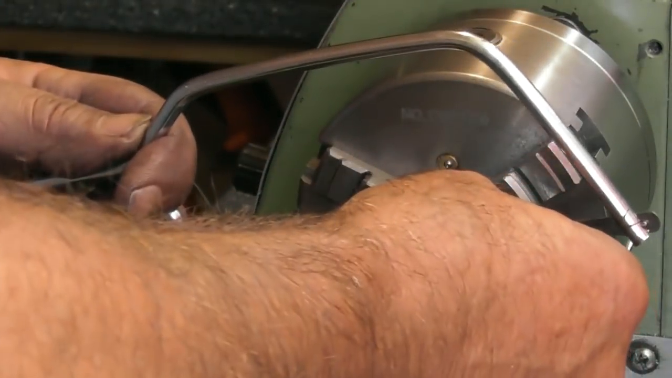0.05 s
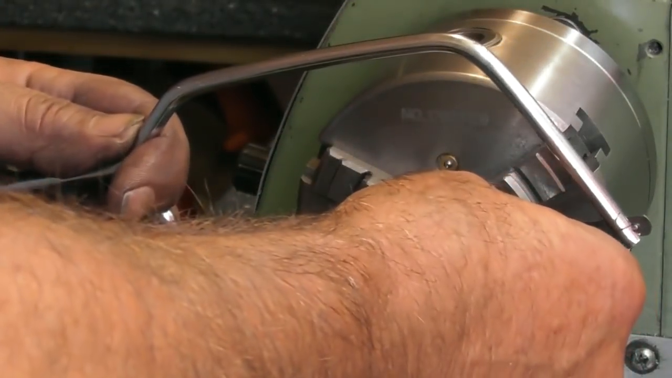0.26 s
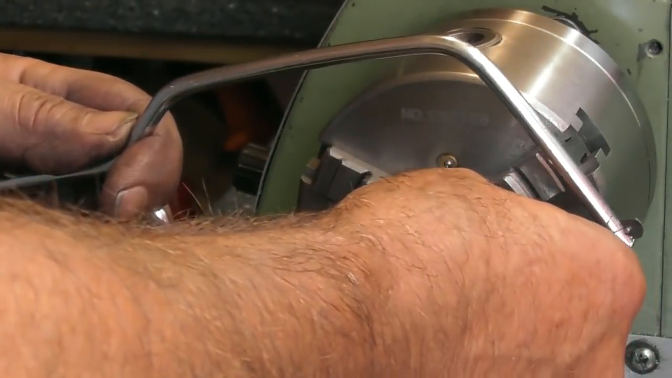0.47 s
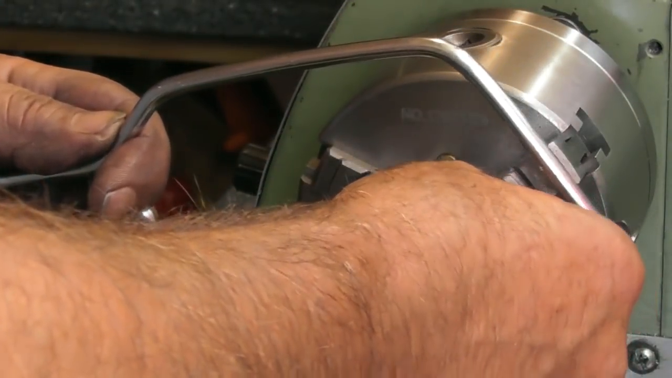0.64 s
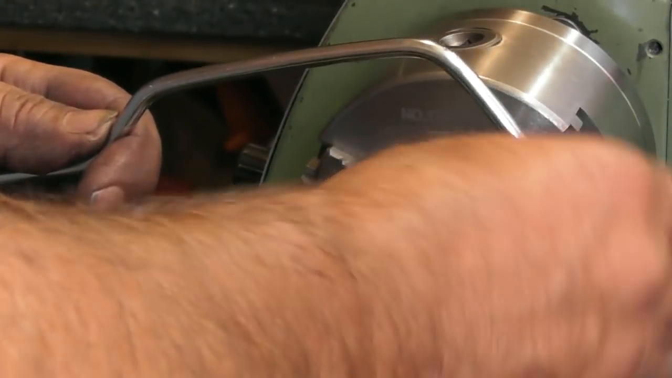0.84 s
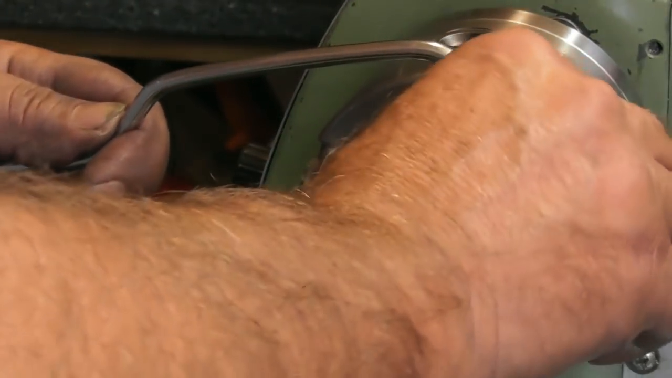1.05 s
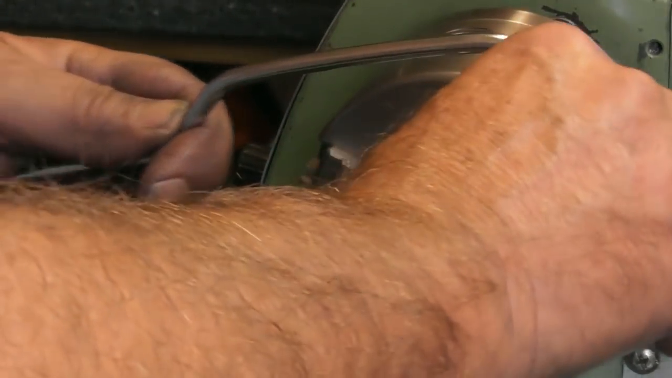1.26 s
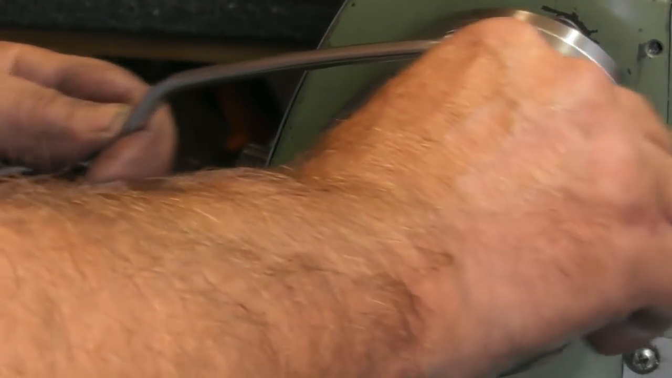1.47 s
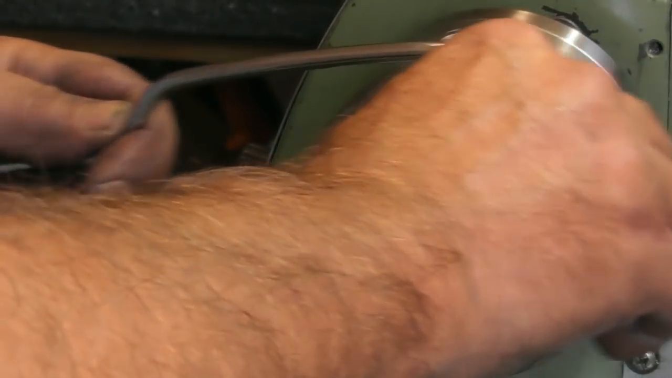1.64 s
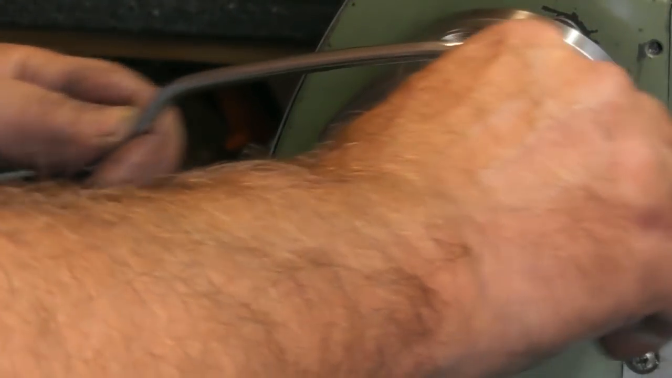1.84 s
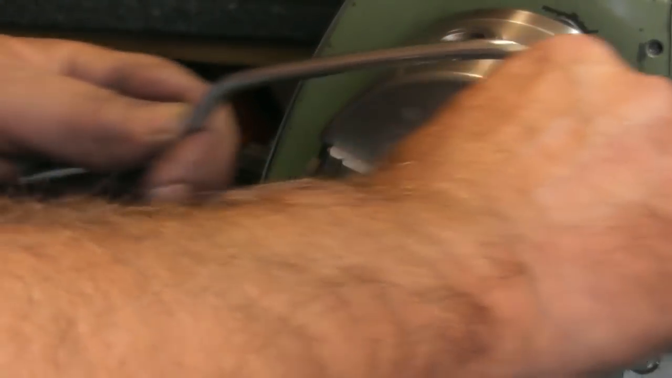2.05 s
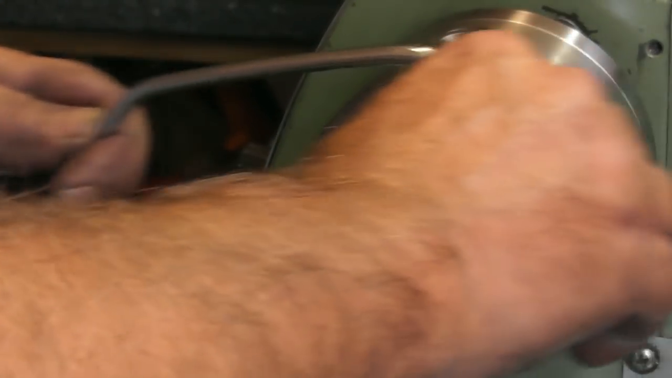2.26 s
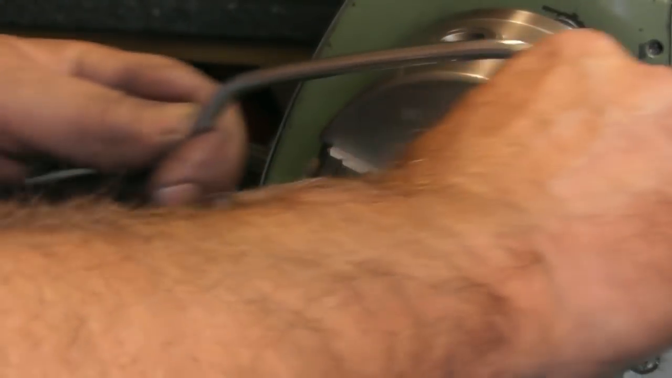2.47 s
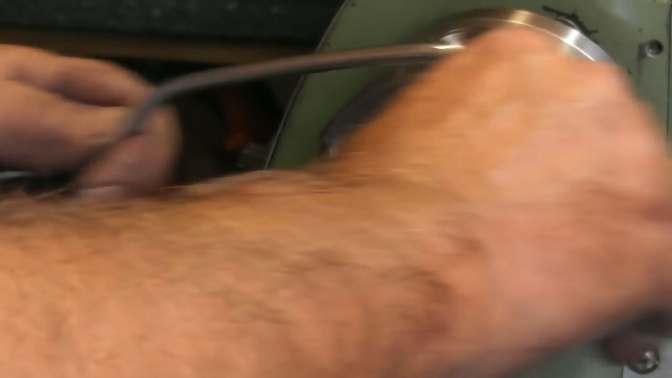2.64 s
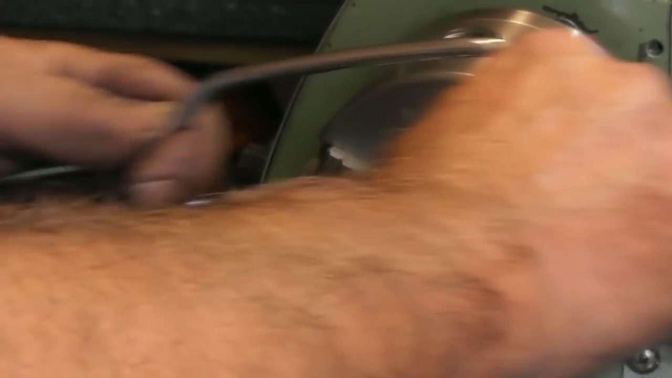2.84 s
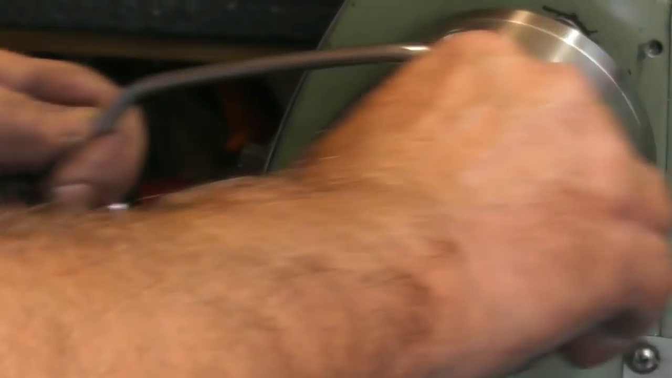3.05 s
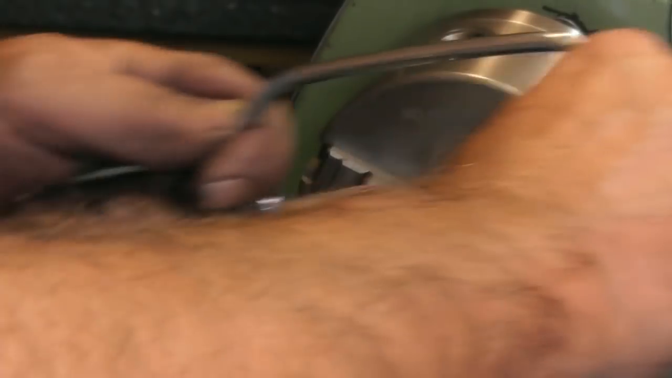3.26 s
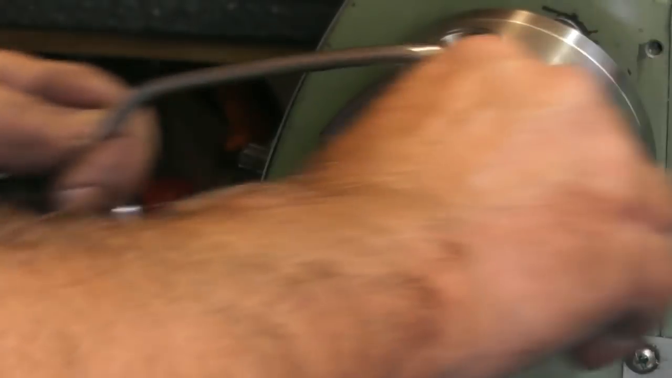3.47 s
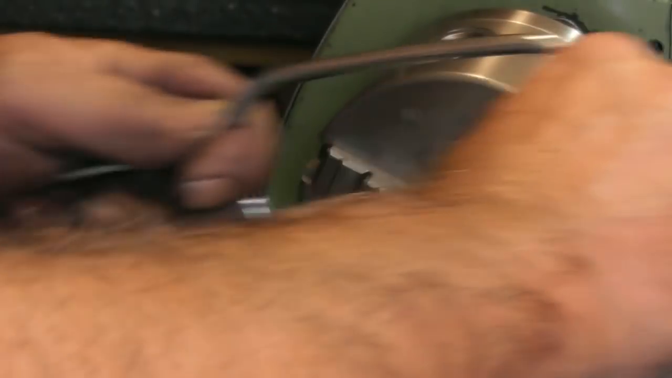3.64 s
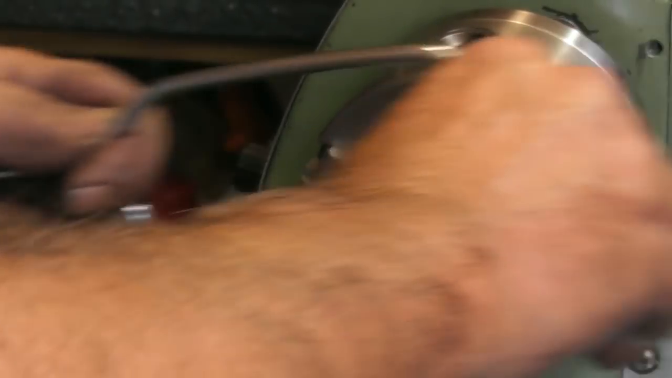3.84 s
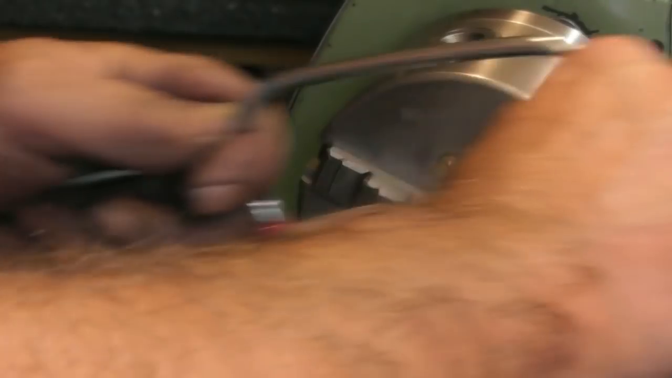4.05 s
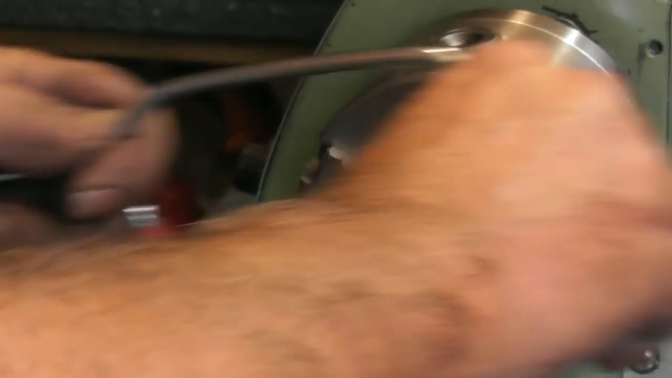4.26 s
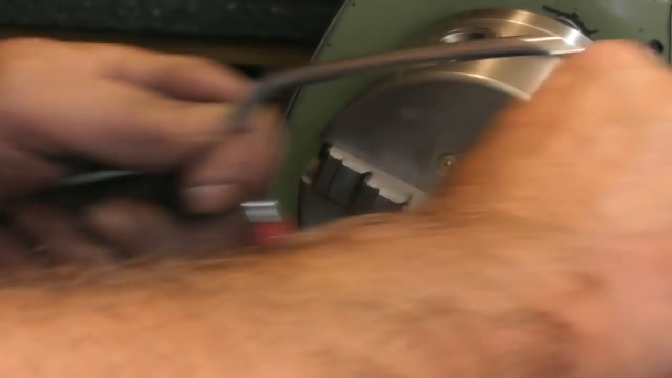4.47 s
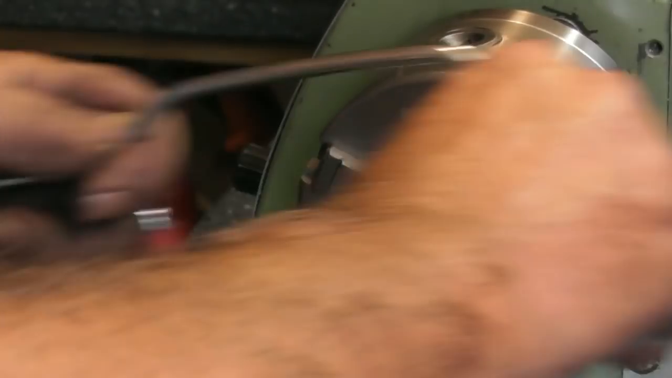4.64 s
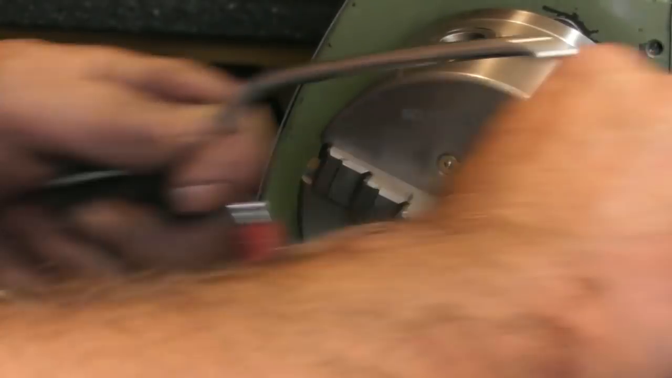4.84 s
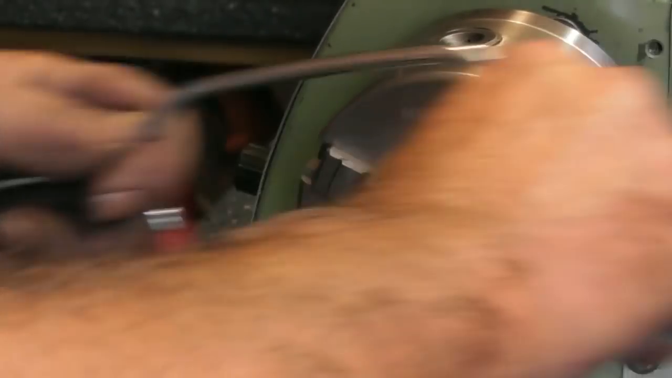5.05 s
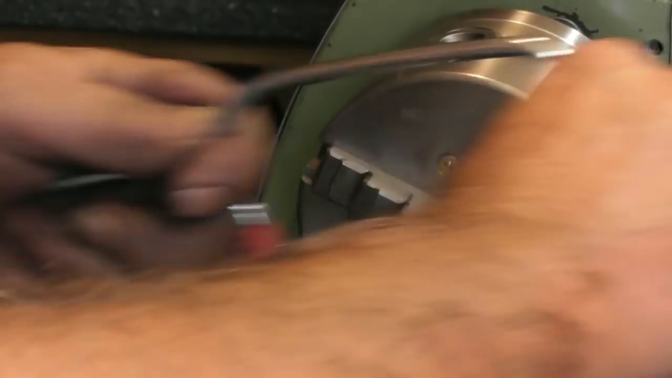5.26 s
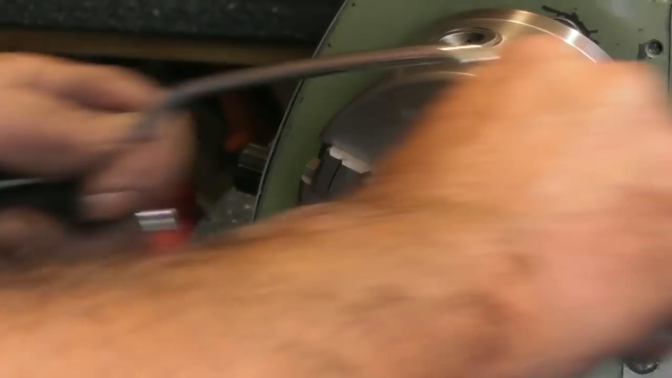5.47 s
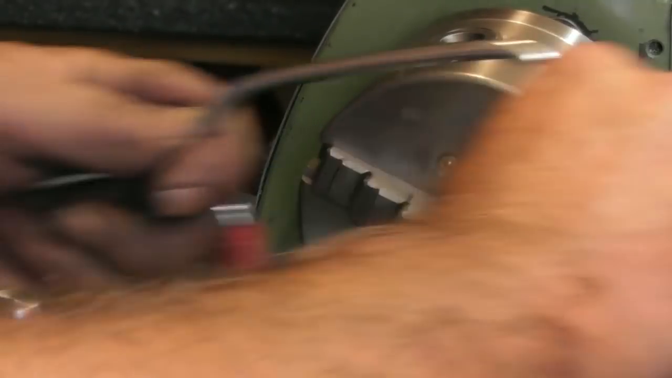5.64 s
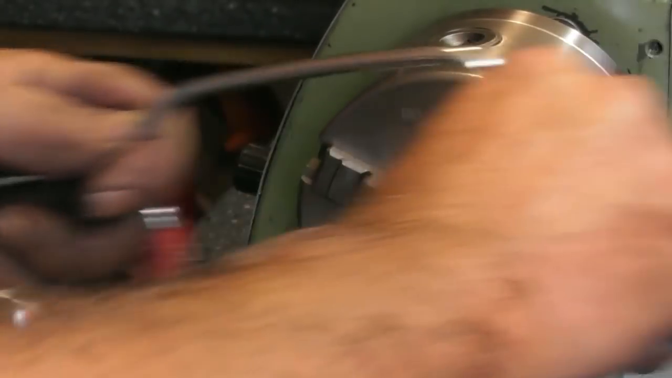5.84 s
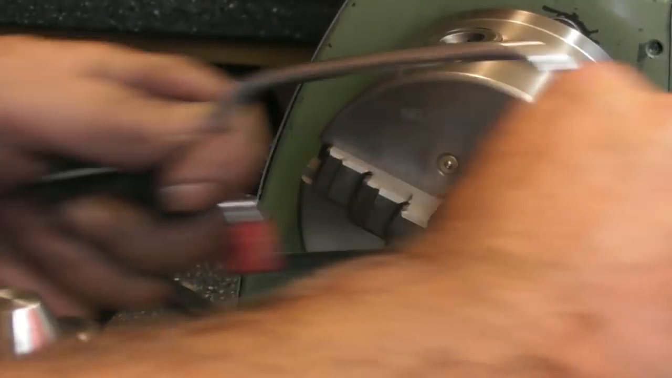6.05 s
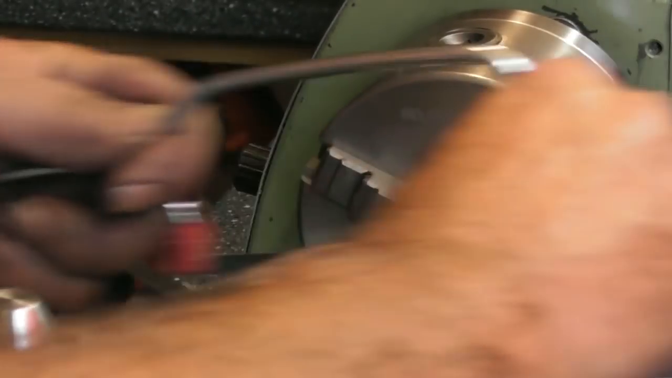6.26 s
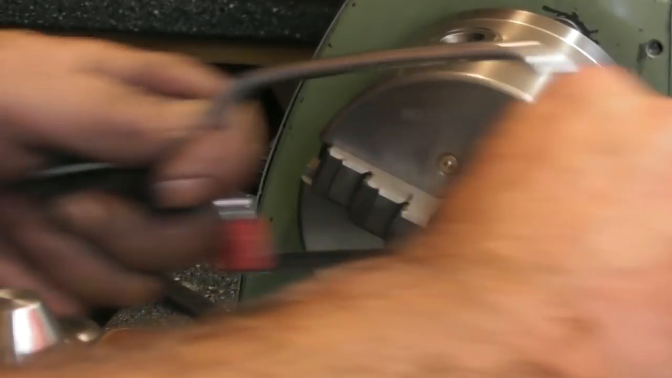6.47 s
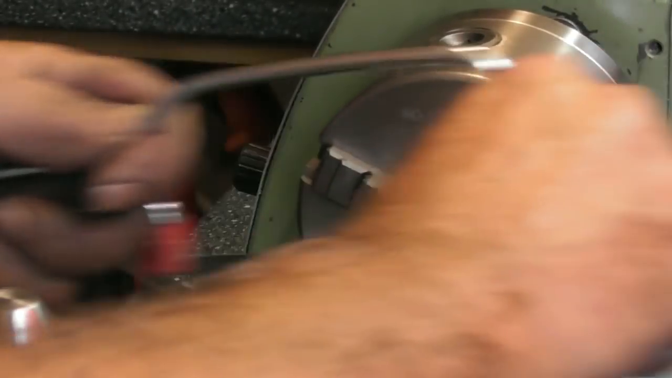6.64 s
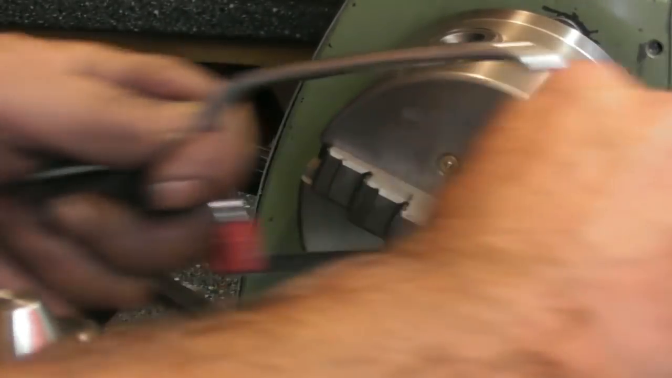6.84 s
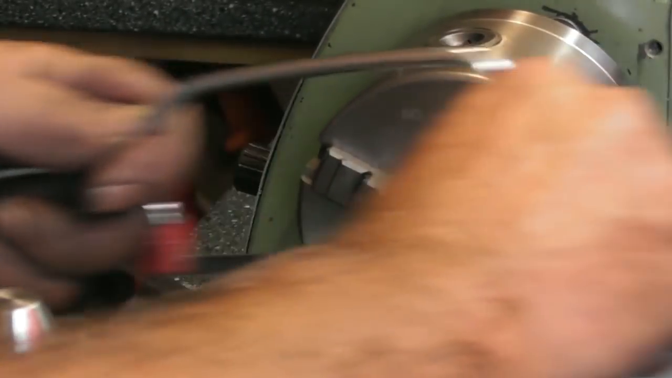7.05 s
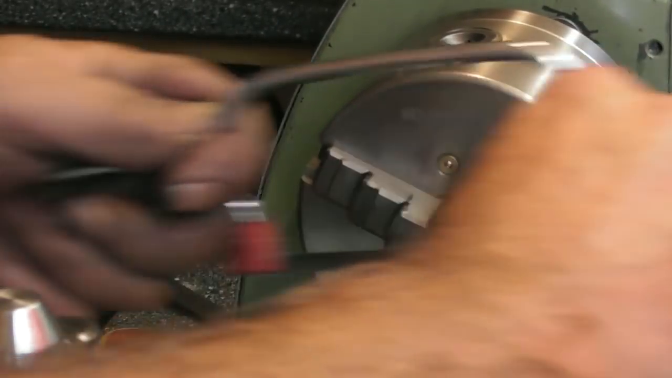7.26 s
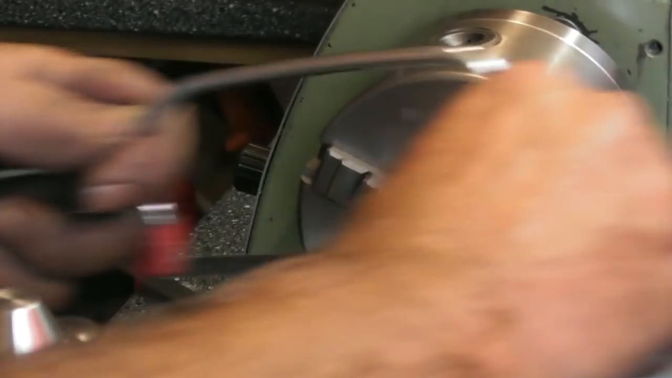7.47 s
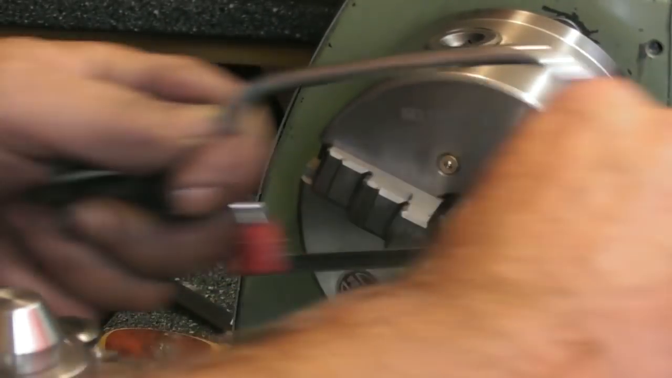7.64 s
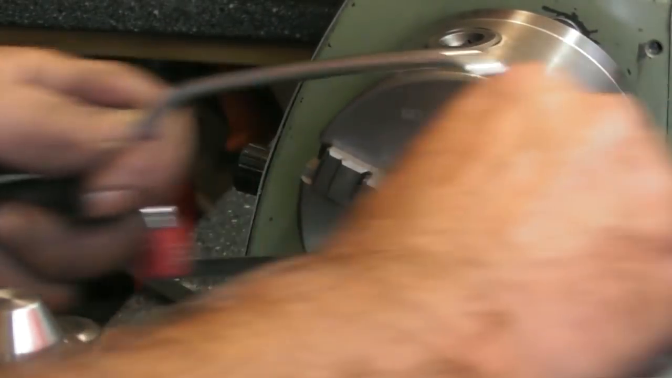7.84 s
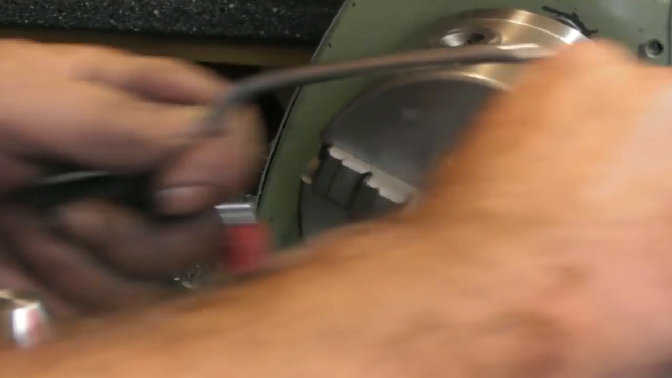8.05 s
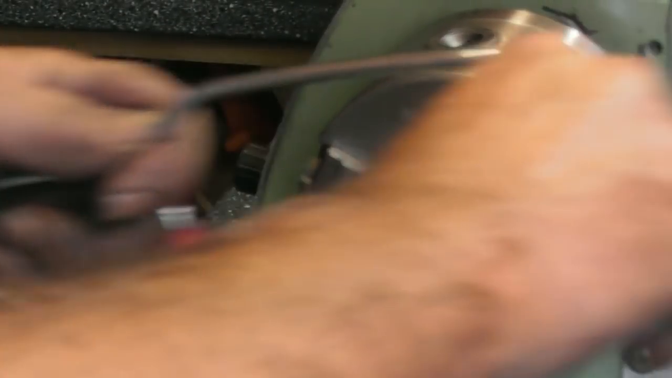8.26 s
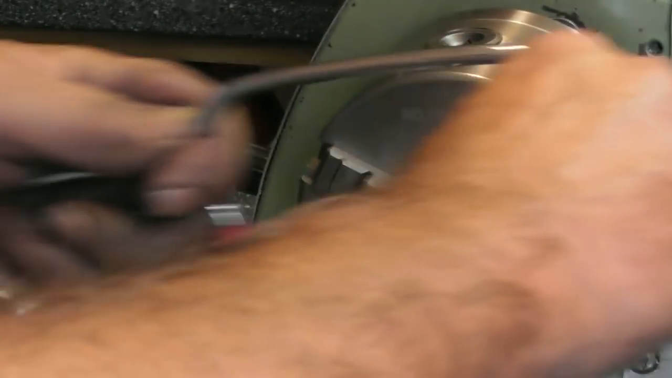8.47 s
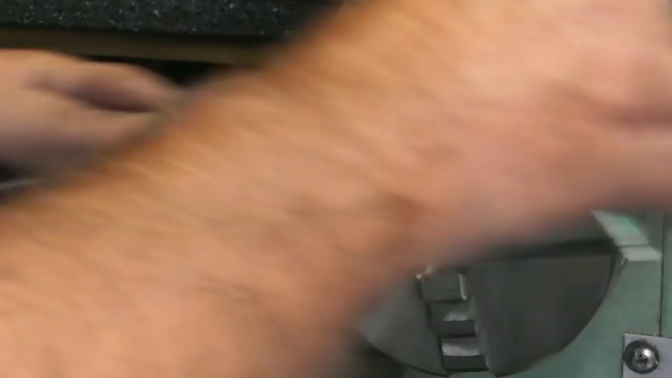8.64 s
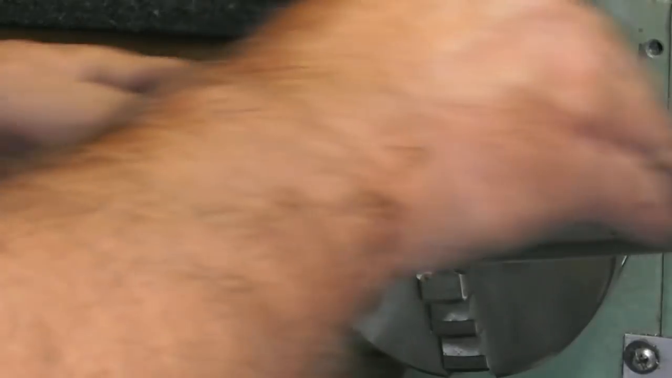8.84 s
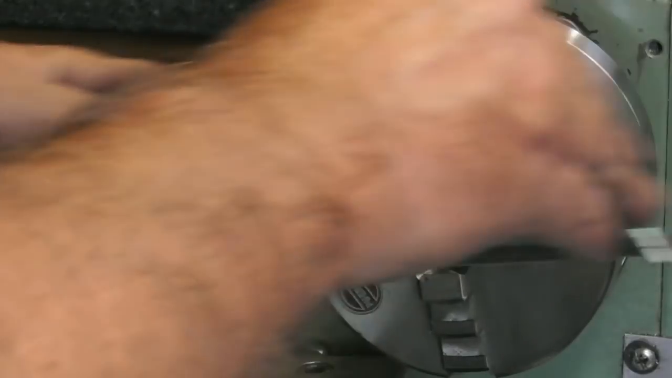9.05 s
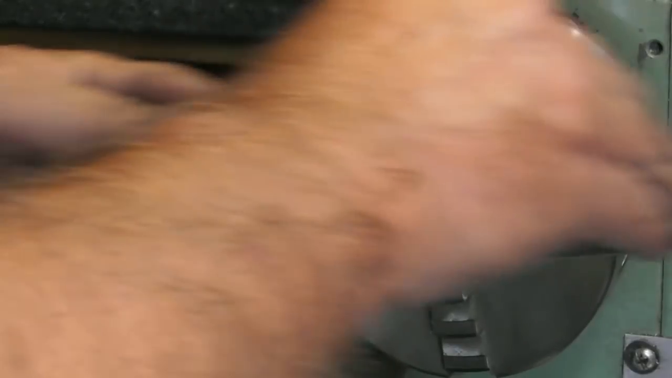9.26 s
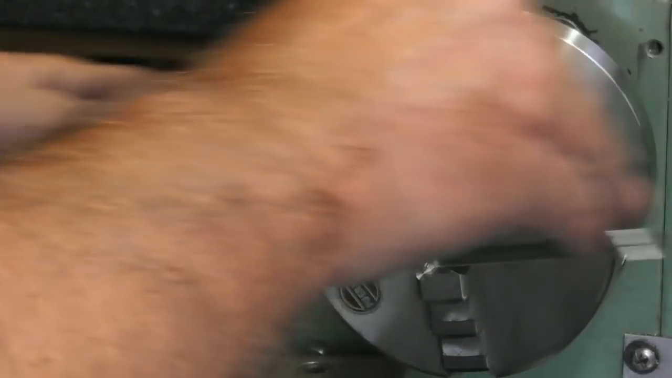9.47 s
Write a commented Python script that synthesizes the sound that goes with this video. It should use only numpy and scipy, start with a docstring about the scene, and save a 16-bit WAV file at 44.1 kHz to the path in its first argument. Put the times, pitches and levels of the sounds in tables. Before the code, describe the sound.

Close stereo microphones in a quiet workshop. Still air, then a few soft knocks and a faint scratch as a hacksaw is set on a small brass rod. Sawing starts lightly after a second and settles into about five alternating push and pull strokes each second, with hollow low drumming, gritty rasp, bright blade ring and hiss. Late on, short squeaks and a faint low drone appear.

```python
"""Still air and a low rumble, soft knocks and a faint scratch as a hacksaw is set on a small brass rod, then sawing.
A quiet workshop, close up: the rod sits in a lathe chuck and the saw, gentle at first, swings some 2.5 times a second.
Tooth strikes and torn chips excite the modes of frame and lathe; friction noise, shaped by resonances, gives the
blade's ring, rasp and hiss, and a caught tooth knocks. Late on come short squeaks and a faint drone, twice."""
import sys
import numpy as np
from scipy import signal
from scipy.fft import rfft, irfft, next_fast_len
from scipy.io import wavfile
from scipy.ndimage import uniform_filter1d

SR = 44100
rng = np.random.default_rng(int(sys.argv[2]) if len(sys.argv) > 2 else 0)


def unload_audio(sound):
    """Save the sound as a 16-bit wav file, at the path given as the first command line argument."""
    columns = np.transpose(np.atleast_2d(sound))
    # keep every value between -1 and 1, then stretch to whole-number steps
    steps = np.round(np.clip(columns, -1, 1) * 32767)
    wavfile.write(sys.argv[1], SR, steps.astype(np.int16))


N = 418950
TIME = np.arange(N) / SR
FFT_SIZE = next_fast_len(N + 4096)
FREQS = np.maximum(np.arange(FFT_SIZE // 2 + 1) * SR / FFT_SIZE, 1)

# strokes of the arm, push and pull in turn: start t/s, strength of the drumming level/dB
STROKES = [(1.132, -29), (1.398, -27.5), (1.629, -26), (1.82, -26), (2.005, -23), (2.204, -25.5),
           (2.391, -24.5), (2.602, -22), (2.78, -22.5), (2.993, -25.5), (3.187, -23.5), (3.387, -27.5),
           (3.599, -22), (3.806, -28), (4.001, -24), (4.21, -30.5), (4.401, -25.5), (4.619, -30),
           (4.815, -24), (5.021, -28.5), (5.218, -24), (5.421, -28), (5.62, -24.5), (5.824, -28.5),
           (6.018, -26.5), (6.23, -29.5), (6.423, -25.5), (6.624, -29.5), (6.82, -25), (7.027, -30.5),
           (7.216, -25), (7.424, -30.5), (7.614, -26.5), (7.823, -30), (8.013, -26.5), (8.236, -31),
           (8.427, -26.5), (8.634, -31), (8.816, -28.5), (9.032, -31.5), (9.23, -25), (9.429, -30.5)]
LAST_STROKE_END_S = 9.64
# spectrum of the blade's sides rubbing: f/Hz, spectral density level/dB
RASP_COLOUR = [(900, 7), (1300, -0.5), (1600, -4.5), (2100, 1), (2700, 1), (3200, 0), (4000, 1.5),
               (5000, -3), (6500, -8.5)]


def from_db(db):
    """Level to amplitude: 20 dB is a factor of ten."""
    return 10 ** (np.asarray(db) / 20)


def rms_one(x):
    """Normalization: equal mean power, rms 1."""
    return x / np.sqrt(np.mean(x ** 2) + 1e-20)


def curve(rows, at=TIME):
    """Linear interpolation of every column over the first."""
    x, *columns = np.transpose(rows)
    return np.array([np.interp(at, x, column) for column in columns])


def over_hz(points):
    """Interpolation of a spectrum, linear in log frequency."""
    hz, value = np.transpose(points)
    return np.interp(np.log(FREQS), np.log(hz), value)


def drift(rate_hz):
    """Random modulation: white noise through a double low-pass pole, rms 1."""
    step = 20   # samples between computed values
    pole = np.exp(-2 * np.pi * rate_hz * step / SR)
    white = rng.standard_normal(N // step + 2002)
    slow = signal.lfilter([1], [1, -2 * pole, pole * pole], white)[2000:]   # without the onset
    return np.interp(np.arange(N) / step, np.arange(len(slow)), rms_one(slow))


def white_pair():
    """Partial coherence: a shared and an opposed part make two channels less alike in the top treble."""
    # likeness of the two channels: f/Hz, correlation (0-1)
    likeness = [(60, 0.65), (110, 0.9), (200, 0.89), (380, 0.89), (700, 0.86), (1290, 0.95), (2380, 1),
                (4400, 1), (8120, 1), (15000, 0.082)]
    alike = np.clip(over_hz(likeness), 0, 1)
    mid, side = rfft(rng.standard_normal((2, FFT_SIZE)))
    return np.sqrt(1 + alike) * mid + np.sqrt(1 - alike) * side * [[1], [-1]]


def noise(gain):
    """Spectral shaping: white stereo noise weighted by a gain over frequency, rms 1."""
    return rms_one(irfft(white_pair() * gain, FFT_SIZE)[:, :N])


def peak(hz, width_hz):
    """Resonance: gain 1 at the centre, falling away on both sides."""
    return 1 / (1 + ((FREQS - hz) / (.78 * width_hz)) ** 2)


def wavering(hz, width_hz):
    """Narrow-band noise: two random envelopes in quadrature on a carrier that follows a pitch, rms about 1."""
    turn = 2 * np.pi * np.cumsum(hz * np.ones(N)) / SR
    return drift(width_hz) * np.cos(turn) + drift(width_hz) * np.sin(turn)


def swell(s, half_s):
    """Gaussian envelope around a moment."""
    return np.exp(-np.minimum(((TIME - s) / half_s) ** 2, 60))


def catches(per_s, decay_s, size_db):
    """Stick-slip: friction jumps at random moments and decays exponentially; mean power 1."""
    jumps = (rng.random(N) < per_s / SR) * from_db(size_db) * rng.uniform(0.54, 0.78, N)
    decay = np.exp(-1 / (decay_s * SR))
    return rms_one(1 + signal.lfilter([1], [1, -decay], jumps + 1e-18))


def ring_body(force):
    """Modal superposition: frame and lathe answer a force with damped resonators in parallel."""
    # modes of saw frame, chuck and lathe: f/Hz, width f/Hz, relative level/dB
    body_modes = [(154, 54, -17.5), (190, 61, -16), (250, 15.1, -3), (301.2, 12.5, -11.5), (384, 28.4, 2),
                  (410.6, 23.2, -0.5), (431.8, 8.4, -3.5), (474.6, 44, -1.5), (522.4, 38.5, -3),
                  (546.8, 24, -5), (620.5, 33, -15), (687, 32, -15.5), (772, 14, -17.5), (840, 44, -21.5),
                  (973, 26, -22), (1014, 58, -24.5), (1089.3, 25.5, -16), (1270, 19, -24.5)]
    out = 0
    for k, (hz, width_hz, db) in enumerate(body_modes):
        r = np.exp(-np.pi * width_hz / SR)
        feed = np.array([1, 0, -1]) * (1 - r * r) / 2
        back = [1, -2 * r * np.cos(2 * np.pi * hz / SR), r * r]
        mode = signal.lfilter(feed, back, force + 1e-18)
        out = out + (-1) ** k * from_db(db) * mode   # neighbours have opposite sign
    return signal.sosfilt(signal.butter(3, [110, 1350], "band", fs=SR, output="sos"), out)


def shop():
    """Background noise: steady shaped air noise, a growing rumble and a passing drone add up."""
    # spectrum of the still air: f/Hz, spectral density level/dB
    air_colour = [(12, -42), (20, -7), (49, -3), (208, -4.5), (252, 1), (290, -3.5), (616, -7.5), (669, -8),
                  (1590, -24.5), (1930, -23), (2930, -35), (3760, -30), (4970, -40), (7770, -28.5),
                  (15600, -35)]
    # growth of the rumble: t/s, rms level/dB
    rumble_growth = [(0, -68.5), (1.2, -59), (2.5, -53.5), (6.3, -52), (7.7, -51), (9.5, -49)]
    # spectrum of the rumble: f/Hz, spectral density level/dB
    rumble_colour = [(15, -8), (35, 3), (55, 4.5), (90, -5), (125, 6), (170, 9), (260, -30)]
    air = from_db(-52.5) * noise(from_db(over_hz(air_colour)))
    rumble = from_db(curve(rumble_growth)[0]) * noise(from_db(over_hz(rumble_colour)))
    return air + rumble + drone()


def snags(soft_hz=520):
    """Impulse response: setting down the blade, or a caught tooth letting go, knocks softly on the body."""
    # the blade is set on the rod, later its teeth snag: t/s, peak level/dB
    knocks = [(0.576, -41), (.67, -31), (.682, -28.5), (.755, -37.5), (1.06, -35), (1.103, -31.5),
              (1.13, -29.5), (1.702, -17.5), (1.939, -17), (2.143, -16), (2.331, -16), (2.449, -15.5),
              (2.843, -11), (3.299, -12), (3.658, -16.5), (3.948, -13), (4.044, -17), (4.349, -15),
              (5.578, -13), (5.652, -17), (5.987, -11.5), (6.049, -16), (6.378, -13.5), (8.09, -18.5),
              (8.474, -18), (9.197, -22), (9.265, -13), (9.329, -17)]
    force = np.zeros(N)
    for s, db in knocks:
        force[int(s * SR)] += from_db(db)
    soft = signal.butter(2, soft_hz, fs=SR, output="sos")
    height = np.abs(ring_body(signal.sosfilt(soft, signal.unit_impulse(4096)))).max()   # one knock's peak
    return ring_body(signal.sosfilt(soft, force + 1e-18)) / height


def touch():
    """Friction noise: the teeth scratch faintly, under a Gaussian envelope, as they are set down."""
    # contact before the first stroke: t/s, level/dB, half length t/s
    contact = (0.665, -57.5, 0.017)
    s, db, half_s = contact
    # the density table serves directly as a signed gain here
    colour = over_hz(RASP_COLOUR) * (FREQS < 9000) + peak(8000, width_hz=1100)
    return from_db(db) * swell(s, half_s) * noise(colour)


def swing():
    """Phase of the reciprocating arm: the whole part counts strokes done, the rest is the present one's share."""
    turns = np.append(np.array(STROKES)[:, 0], LAST_STROKE_END_S)
    return np.interp(TIME, turns, np.arange(len(turns)))


def course(rows, share, depth, knee=1.91, shallow_drop_db=19.0, grip=1.35):
    """Speed-dependent level: layers drop as the arm slows, more in a shallow slot, and swell more in a deep one."""
    full_db, drop_db, swell_db, moment, half = np.transpose(rows)[:, :, None]
    slowness = (1 - np.abs(np.sin(np.pi * share))) ** knee
    leaning = np.exp(-((share - moment) / half) ** 2)
    pause_db = (drop_db + shallow_drop_db * (1 - depth)) * slowness
    return full_db - pause_db + depth ** grip * swell_db * leaning


def arm(pull_pace=0.96, pull_evenness=0.87):
    """Reciprocating motion: direction, place along the blade, slot depth, tooth rate, evenness and four gains."""
    # Rows body, rasp, cut, chips, before stroke strength and pressure are added. Columns: full-speed level/dB,
    # drop at rest in a deep slot level/dB, swell as the hand leans in level/dB, its moment and half length (0-1 of stroke)
    push_levels = [(-0.73, 8.6, 1, 0.24, 0.56), (-44, 8, 7.8, 0.5, 0.13), (-34.5, 18, 6.9, 0.32, 0.16),
                   (-31, 47, 7.2, 0.42, 0.17)]
    # the same on the pull, where the swell comes late
    pull_levels = [(-3.5, 5, 9.1, 0.84, 0.24), (-47.5, 7.5, 5, 0.64, 0.37), (-38, 13.3, 7.4, 0.72, 0.18),
                   (-33, 28, 5, 0.61, 0.18)]
    # working depth in the slot: t/s, depth (0-1)
    slot_depth = [(1.1, 0.44), (2.1, 0.36), (3.2, 0.71), (4.4, 1), (8.4, 0.98), (9.5, 0.77)]
    # pace of the arm on the push: t/s, tooth rate at mid-stroke f/Hz
    pace = [(1.2, 247), (2.35, 320), (2.7, 511), (3.7, 676), (4.1, 720), (5.0, 780), (6.1, 780), (8.1, 720),
            (8.7, 600), (9.5, 663)]
    # the hand bears down, eases late on and presses again at the end: t/s, pressure level/dB
    hand_pressure = [(1.13, -27), (1.3, -14.5), (1.5, -10.5), (1.9, -5), (2.1, 0), (2.9, 1.55), (4.4, -0.5),
                     (5.6, -1), (7.6, 0.35), (8.9, -3.5), (9.25, 2.5)]
    # how evenly the teeth bite on the push: t/s, evenness (0-1)
    bite_evenness = [(1.2, 0.25), (2.7, 0.52), (5.7, 0.61), (6.5, 0.33), (7.4, 0.05), (9.5, 0.19)]
    # gain of rasp, cut and chips per dB of pressure: level/dB
    follows_pressure = (0.46, 1.0, 1.5)
    start, strength_db = np.transpose(STROKES)
    done = swing()
    k = np.minimum(done.astype(int), len(start) - 1)
    share, pushing = done - k, k % 2 == 0
    place = (1 - np.cos(np.pi * done)) / 2   # 0 before a push, 1 after it
    depth = np.clip(curve(slot_depth)[0], 0, 1)
    pressure_db = curve(hand_pressure)[0]
    levels = np.where(pushing, course(push_levels, share, depth), course(pull_levels, share, depth))
    levels = levels + np.vstack([strength_db[k], np.outer(follows_pressure, pressure_db)])
    gains = uniform_filter1d(from_db(levels) * (TIME > start[0]), size=150, axis=1)   # no clicks at the turns
    speed = np.abs(np.sin(np.pi * share))
    tooth_rate = curve(pace)[0] * np.where(pushing, 1, pull_pace) * speed
    even = np.clip(curve(bite_evenness)[0] * np.where(pushing, 1, pull_evenness), 0, 1)
    return pushing, place, depth, tooth_rate, even, gains


def teeth(tooth_rate, even, jitter=0.02487, overtone_db=-18, smear_db=-5.0, smear_hz=110, tears_db=-2.5,
          grain_db=2.5, catches_per_s=1500, direct=0.22, evening=0.67):
    """Forced vibration: teeth in step and chips torn at random drive the body; the tooth rate sweeps its modes."""
    turn = 2 * np.pi * np.cumsum(tooth_rate * (1 + jitter * drift(57.5))) / SR
    beat = np.sin(turn) + from_db(overtone_db) * np.sin(2 * turn)
    beat = beat * from_db(3.8 * drift(39))
    beat = beat * np.clip(tooth_rate / 260, 0, 1) ** 2   # slow teeth hardly strike
    steady = rms_one(ring_body(beat)) + direct * beat * np.clip(tooth_rate / 600, 0, 1) ** 2
    # an uneven bite smears the tooth tone into a band around the same rate
    smeared = from_db(smear_db) * rms_one(ring_body(wavering(tooth_rate, smear_hz)))
    tears = (rng.random(N) < catches_per_s / SR) * rng.standard_normal(N) * from_db(grain_db * drift(42.0))
    torn = from_db(tears_db) * rms_one(ring_body(tears))
    shake = even * steady + smeared + np.sqrt(np.maximum(1 - even ** 2, 0)) * torn
    # the hand's pressure holds the shaking to a more even strength
    power = np.maximum(uniform_filter1d(shake ** 2, size=1300), 1e-6)
    return rms_one(shake / power ** (evening / 2))


def sliding_mode(place, rows, width_hz, wander=.07):
    """Length-dependent bending mode: pitch and strength follow the place of the cut along the blade."""
    hz, db = curve(rows, place + wander * drift(4))
    return from_db(db + 2.66 * drift(37.9)) * wavering(hz, width_hz)


def flanks(pushing, place, depth, rasp_db=-1.5, push_bend_db=-11.0, pull_bend_db=-1.5):
    """Dry friction: the blade's sides rub grittily in the slot, and its free lengths sing as the slot grips them."""
    # narrow resonances added to the rasp: f/Hz, width f/Hz, spectral density level/dB
    rasp_modes = [(1590, 63, 4), (1990, 47, -3), (2440, 48, -3), (2787, 41, 5), (5610, 150, -3)]
    # bending modes of the free blade on either side of the cut: place along the blade (0-1), f/Hz, level/dB
    near_length = [(0, 1550, -8), (.12, 1748, -2.5), (.35, 2126, -3.5), (.55, 2900, -5.5), (.7, 3565, -30)]
    far_length = [(.35, 5404, -22), (.55, 4500, -4.5), (.75, 3400, -4.5), (.9, 2700, -7.5), (1, 2412, -20)]
    resonances = sum(from_db(db) * peak(hz, width_hz) for hz, width_hz, db in rasp_modes)
    colour = from_db(over_hz(RASP_COLOUR)) + resonances
    rubbing = from_db(rasp_db) * noise(colour) * catches(per_s=65, decay_s=0.0066, size_db=-1.0)
    bending = sliding_mode(place, near_length, width_hz=340) + sliding_mode(place, far_length, width_hz=360)
    bend_gain = from_db(np.where(pushing, push_bend_db, pull_bend_db)) * np.sqrt(depth)
    return rubbing + bend_gain * bending


def blade(pushing, ring_db=-1.0, flutter_db=1.5, sway_db=2.0):
    """Noise-excited resonance: the cutting edge rings the blade's modes, weighted differently on push and pull."""
    # modes of the blade: f/Hz, width f/Hz, relative level on the push/dB, on the pull/dB
    blade_modes = [(5470, 250, -15, -14), (6066, 71, -5, -11), (6760, 310, 0, -13.5), (6977, 69, 5, -7),
                   (7303, 210, 2, 2), (7560, 230, -7, -3), (7870, 440, -8.5, -7.5), (8800, 330, -6, -9),
                   (9250, 330, -26, -27), (11540, 500, -25, -23.5), (14380, 330, -21, -26)]
    # long-ringing modes of the taut blade: f/Hz, width f/Hz, relative level/dB
    taut_modes = [(5960, 50, -10), (6880, 35, -8), (7000, 30, 2), (7390, 34, 6.5)]
    lines = sum(from_db(db) * peak(hz, width_hz) for hz, width_hz, db in taut_modes)
    out = from_db(-7.5) * noise(lines)
    # power of each mode: its squared height times its width
    push, pull = [np.array([from_db(row[k]) ** 2 * row[1] for row in blade_modes]) for k in (2, 3)]
    for (hz, width_hz, _, _), on_push, on_pull in zip(blade_modes, push / push.sum(), pull / pull.sum()):
        strength = np.sqrt(np.where(pushing, on_push, on_pull)) * from_db(sway_db * drift(19.0))
        out = out + strength * noise(peak(hz, width_hz))
    return from_db(ring_db + flutter_db * drift(65.0)) * rms_one(out)


def chips(pushing, depth, push_db=-10.0, pull_db=-11.5, shallow_db=-13.0, grit_db=2.5):
    """Fracture noise: chips break off in a gritty hiss, stronger once the teeth are well in."""
    # spectrum of the hiss: f/Hz, spectral density level/dB
    hiss_colour = [(4500, -17), (6000, -18), (8000, 2.5), (9500, 2), (11000, -0.5), (13000, -1.5),
                   (14800, -4.5), (15800, -4.5)]
    level_db = np.where(pushing, push_db, pull_db) + shallow_db * (1 - depth) + grit_db * drift(280)
    return from_db(level_db) * noise(from_db(over_hz(hiss_colour)))


def bites(bite_after_s=0.052, bite_db=3.0, skate_s=0.004, settle_s=0.027):
    """Friction transient: early in each push the teeth skate, then the friction jumps as they bite, and settles."""
    db = np.zeros(N)
    for s in np.array(STROKES)[::2, 0] + bite_after_s:
        near = slice(int((s - .1) * SR), int((s + .1) * SR))
        since = TIME[near] - s
        sag, jump = -np.exp(-np.abs(since) / skate_s), np.exp(-np.abs(since) / settle_s)
        db[near] += bite_db * np.where(since < 0, sag, jump)
    return from_db(db)


def whistle(place, depth, hz=4360, full_reach_db=-51.5, reach_db=19.0):
    """Friction-excited tone: pushed far through a deep slot, the blade whistles as long as it moves."""
    speed = 2 * np.sqrt(place * (1 - place))
    tone = wavering(hz + 25 * drift(10.0), width_hz=58.5) * from_db(2.0 * drift(40))
    reach = from_db(full_reach_db + reach_db * (place - 1))
    return depth ** 3 * np.minimum(2.1 * speed, 1) * reach * tone


def squeaks(from_s=7.75, level_db=-1.0, width_hz=240, wander=0.03):
    """Stick-slip tones: short rough chirps where the blade binds, at a slightly different pitch each time."""
    # places in every swing where the blade binds: phase (push 0-1, pull 1-2), mean f/Hz,
    # relative level/dB, half length t/s
    binding = [(0.09, 2880, -45, 0.017), (1.2, 2580, -45.5, 0.018), (1.78, 2020, -41.5, 0.01)]
    done, out = swing(), 0
    for phase, hz, db, half_s in binding:
        moments = np.interp(np.arange(phase, done[-1], 2), done, TIME)
        gate = sum(swell(s, half_s) for s in moments[moments > from_s])
        pitch = hz * (1 + wander * drift(2.3))
        tone = 0.36 * np.cos(2 * np.pi * np.cumsum(pitch) / SR) + 0.56 * wavering(pitch, width_hz)
        out = out + from_db(db + level_db) * gate * tone
    return out


def drone(waver_db=4.0, attack_s=0.052, release_s=0.09):
    """Gliding sinusoid: a low tone fades in, drifts in pitch, wavers in level and dies away."""
    # passages of the drone: start t/s, end t/s, initial f/Hz, glide (Hz/s), mean rms level/dB
    passages = [(7.8, 8.349, 70.1, -1.5, -49), (8.948, 9.5, 73.8, 6, -49.5)]
    out = 0
    for start, end, hz, glide_hz_per_s, db in passages:
        since = np.maximum(TIME - start, 0)
        gate = np.minimum(since / attack_s, 1) * np.exp(-np.maximum(TIME - end, 0) / release_s)
        turn = 2 * np.pi * np.cumsum(hz + glide_hz_per_s * since) / SR
        out = out + from_db(db) * gate * np.sqrt(2) * np.sin(turn)
    return out * from_db(waver_db * drift(5.9))


def scene(spread_db=-17.0, chatter_db=1.1, ring_out_s=0.0028):
    """Superposition: one swinging arm drives body, flanks and cutting edge; the blade chatters in the slot."""
    pushing, place, depth, tooth_rate, even, (body, rasp, cut, hiss) = arm()
    chatter = from_db(chatter_db * drift(68)) * catches(per_s=63, decay_s=0.0059, size_db=-2.0)
    # body noise of opposite sign in the two channels widens the drumming
    scattered = from_db(spread_db) * rms_one(ring_body(rng.standard_normal(N))) * np.array([[1], [-1]])
    # the heavy body takes a moment to build up and to die away
    hold = np.exp(-1 / (ring_out_s * SR))
    body = signal.lfilter([1 - hold], [1, -hold], body + 1e-18)
    drumming = body * (teeth(tooth_rate, even) + scattered) + snags()
    friction = rasp * flanks(pushing, place, depth) + cut * blade(pushing) + hiss * chips(pushing, depth)
    # at each reversal the teeth come to rest and the friction weakens
    sliding = np.clip(.5 + tooth_rate / 300, 0, 1)
    sawing = drumming + sliding * chatter * bites() * friction + whistle(place, depth)
    return sawing + squeaks() + touch() + shop()


def record(dry, cutoff_hz=15650):
    """Interchannel difference: two close microphones differ in level and phase; the top is cut steeply."""
    # level of left over right: f/Hz, level/dB
    tilt = [(70, -1.7), (150, -1.4), (250, -2.5), (310, 0.5), (385, -1.3), (430, -3.5), (480, 0.5),
            (540, -2.5), (630, 1), (690, -2), (775, 1), (1090, -0.5), (3000, -0.5), (12000, 0.0)]
    # phase by which left leads: f/Hz, phase (rad)
    lead = [(70, 0.13), (150, 0.25), (250, 0.017), (310, -0.078), (385, -0.0046), (430, 0.22), (480, 0.06),
            (540, 0.055), (630, 1.37), (690, 0.43), (775, 0.69), (1090, -0.47), (3000, -0.16),
            (12000, 0.41)]
    half = from_db(over_hz(tilt) / 2) * np.exp(.5j * over_hz(lead))   # each channel takes half the difference
    top = 1 / np.sqrt(1 + (FREQS / cutoff_hz) ** 300)
    return irfft(rfft(dry, FFT_SIZE) * [half, 1 / half] * top, FFT_SIZE)[:, :N]


dry = scene()
out = record(dry)
unload_audio(out)
```